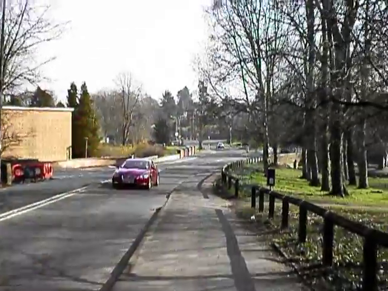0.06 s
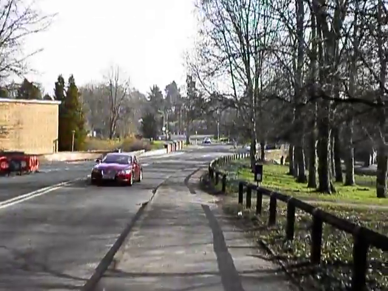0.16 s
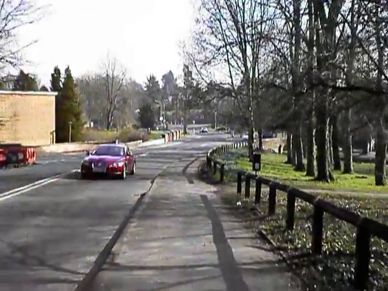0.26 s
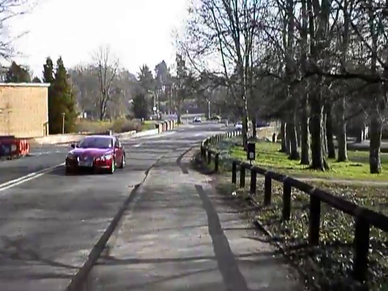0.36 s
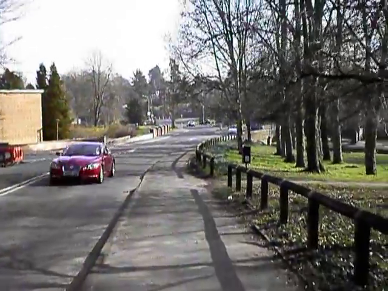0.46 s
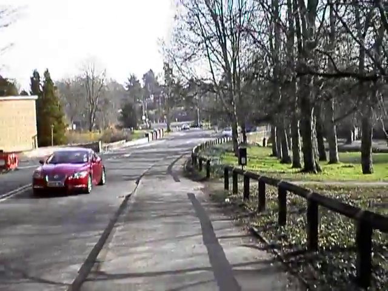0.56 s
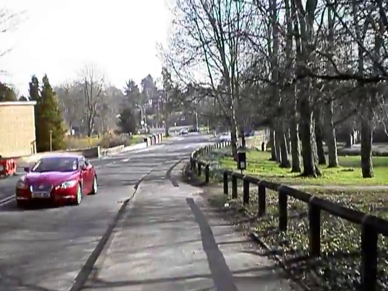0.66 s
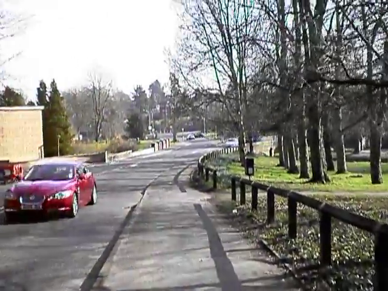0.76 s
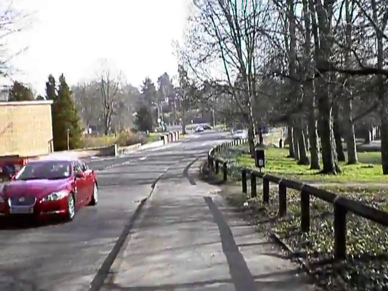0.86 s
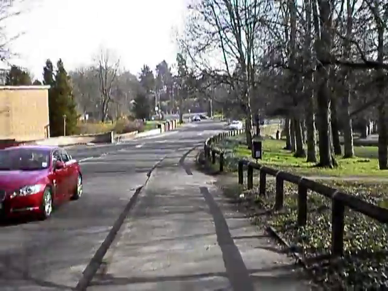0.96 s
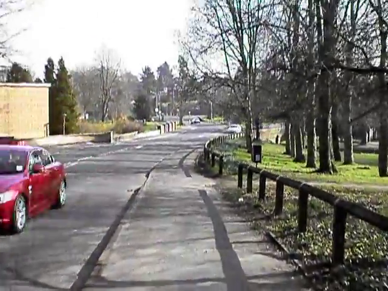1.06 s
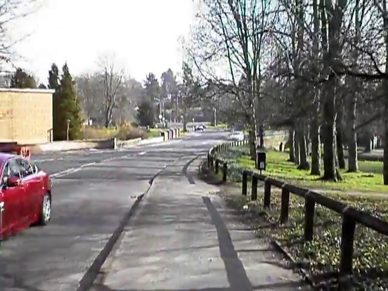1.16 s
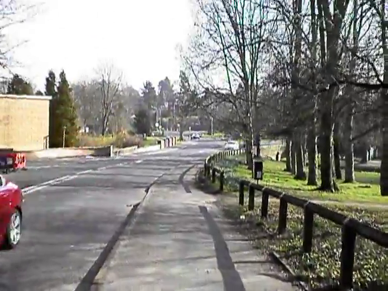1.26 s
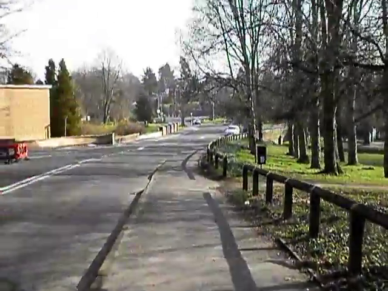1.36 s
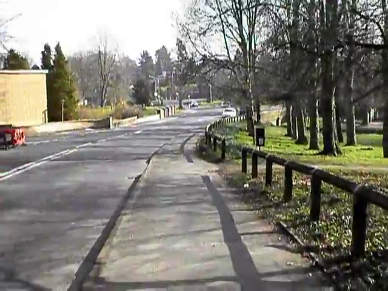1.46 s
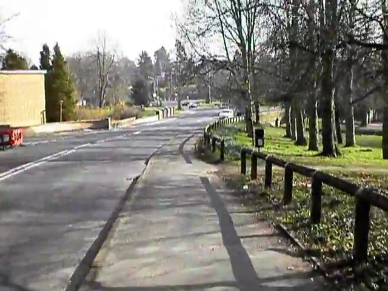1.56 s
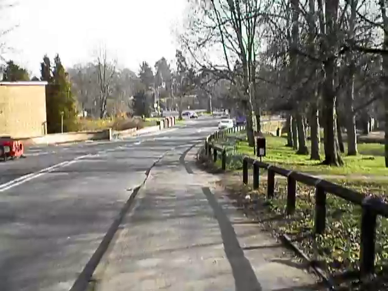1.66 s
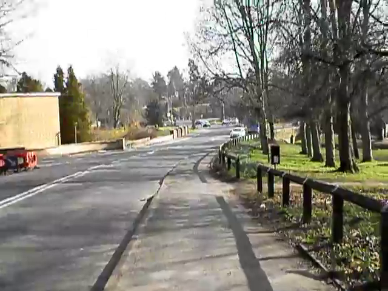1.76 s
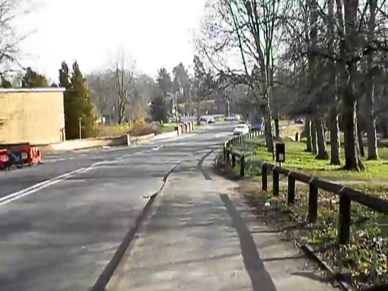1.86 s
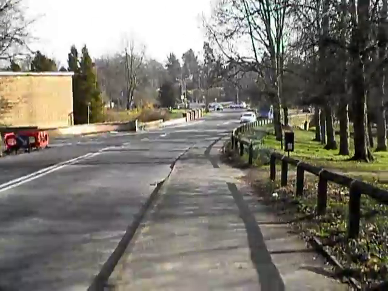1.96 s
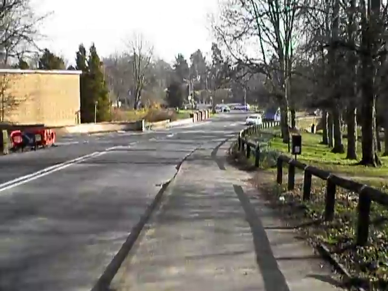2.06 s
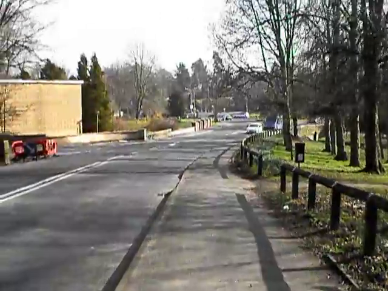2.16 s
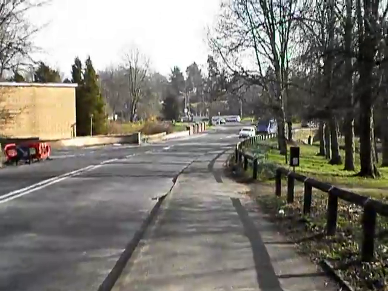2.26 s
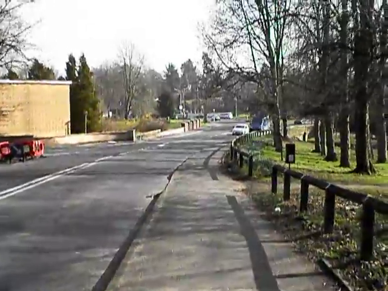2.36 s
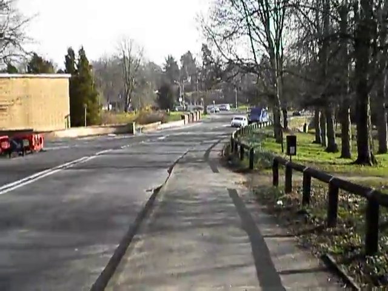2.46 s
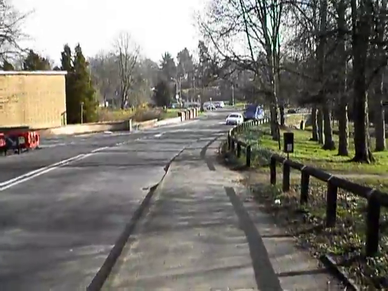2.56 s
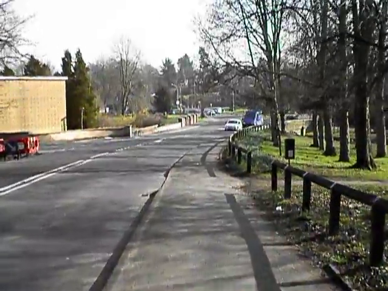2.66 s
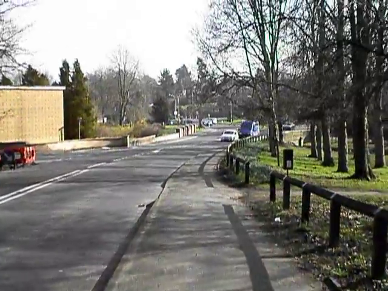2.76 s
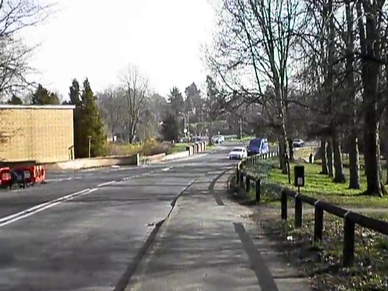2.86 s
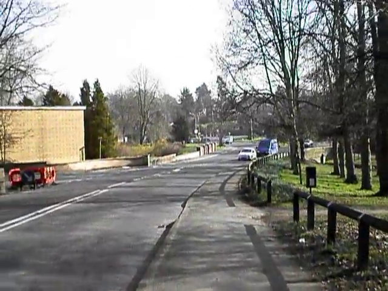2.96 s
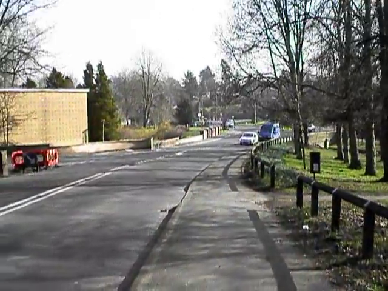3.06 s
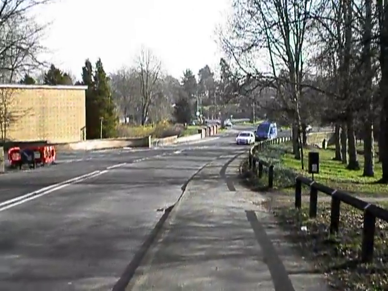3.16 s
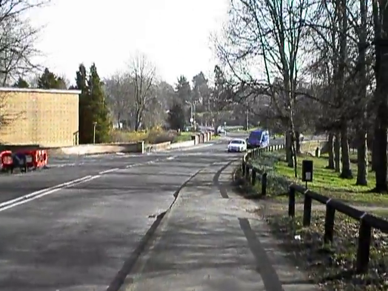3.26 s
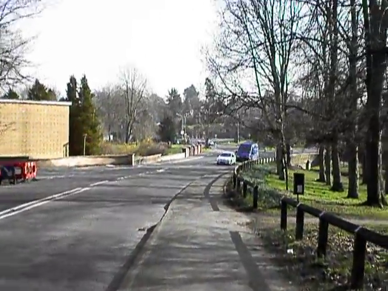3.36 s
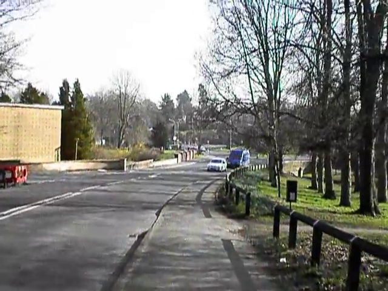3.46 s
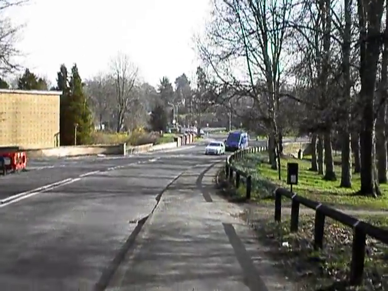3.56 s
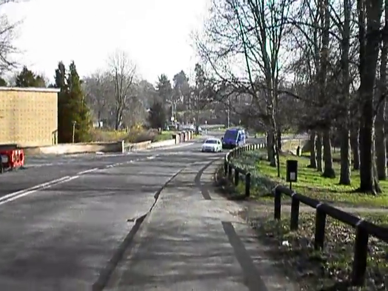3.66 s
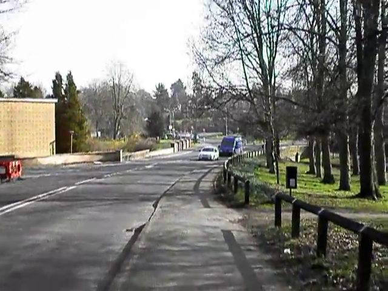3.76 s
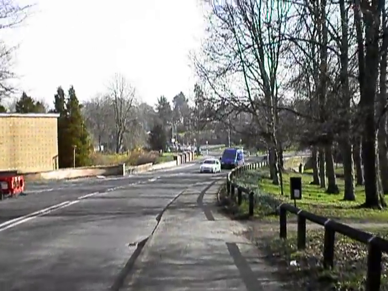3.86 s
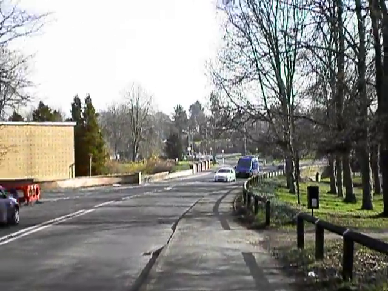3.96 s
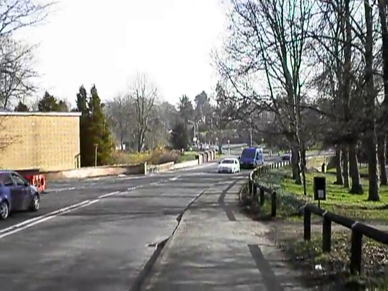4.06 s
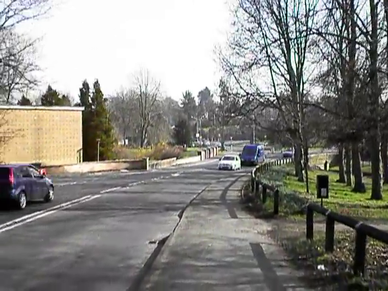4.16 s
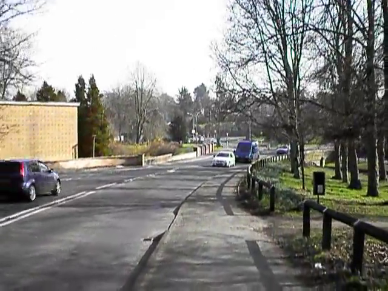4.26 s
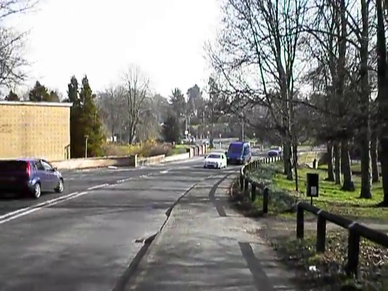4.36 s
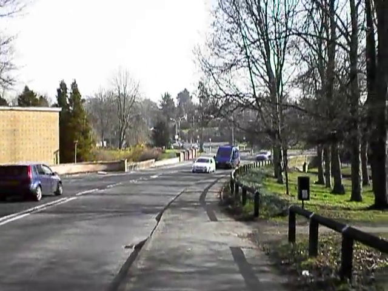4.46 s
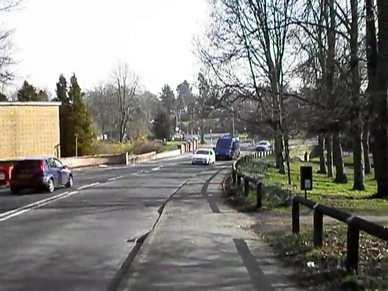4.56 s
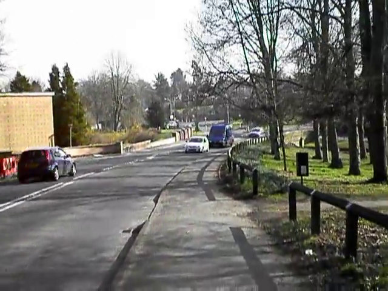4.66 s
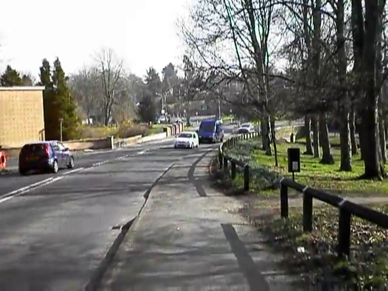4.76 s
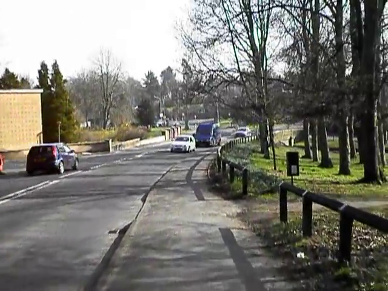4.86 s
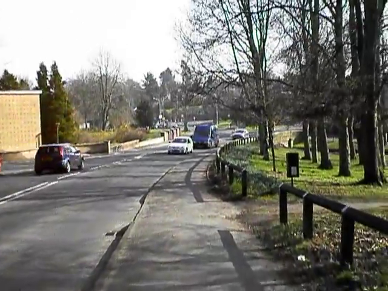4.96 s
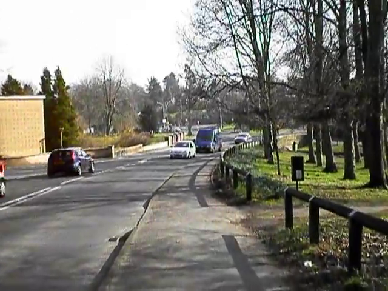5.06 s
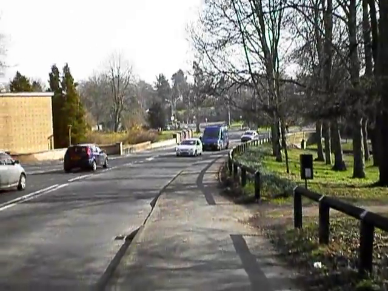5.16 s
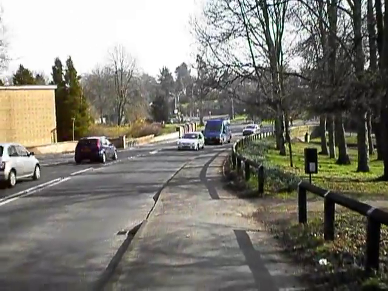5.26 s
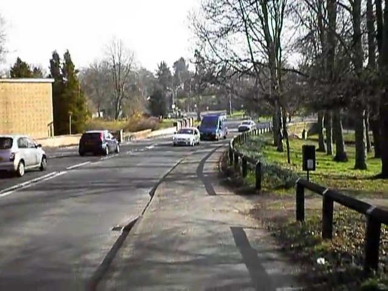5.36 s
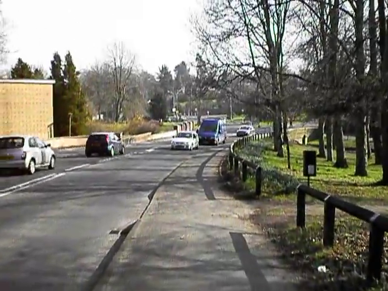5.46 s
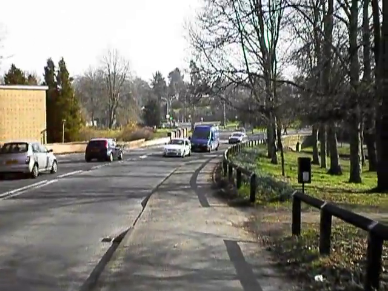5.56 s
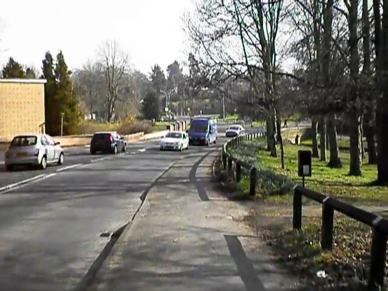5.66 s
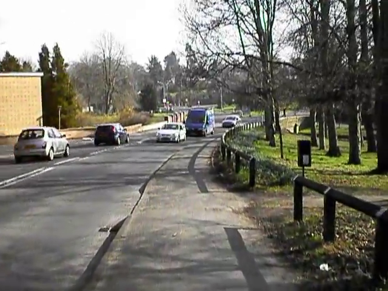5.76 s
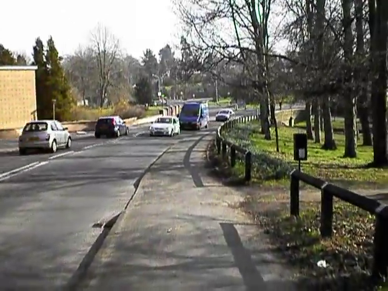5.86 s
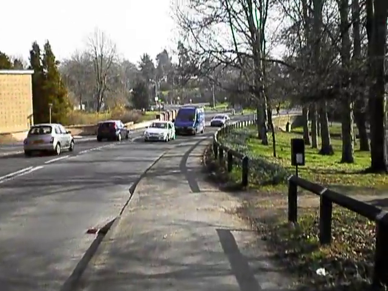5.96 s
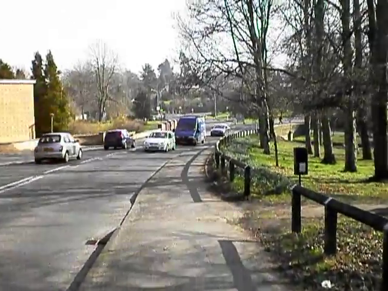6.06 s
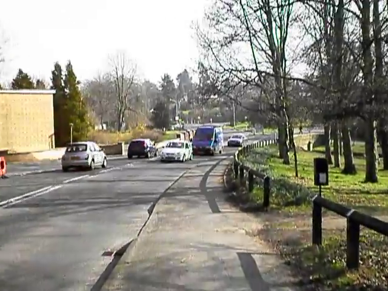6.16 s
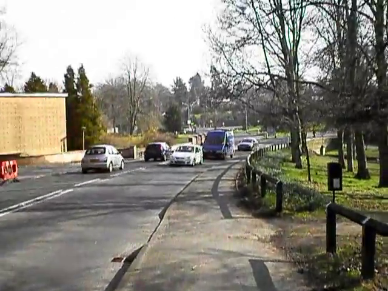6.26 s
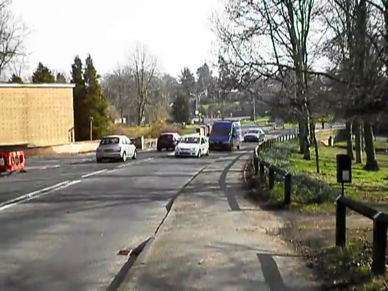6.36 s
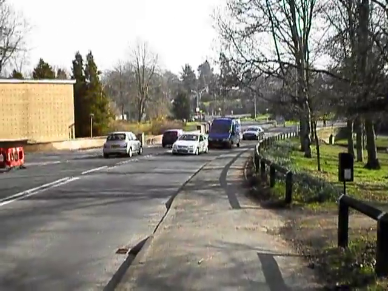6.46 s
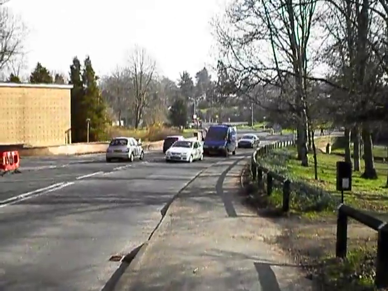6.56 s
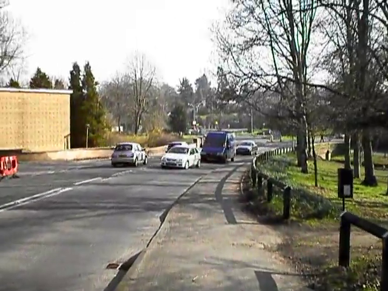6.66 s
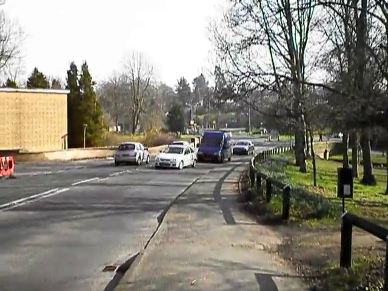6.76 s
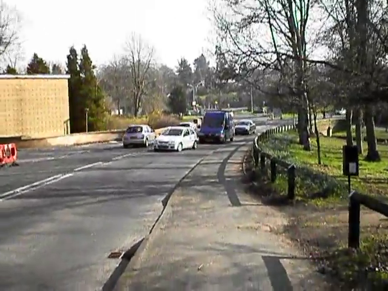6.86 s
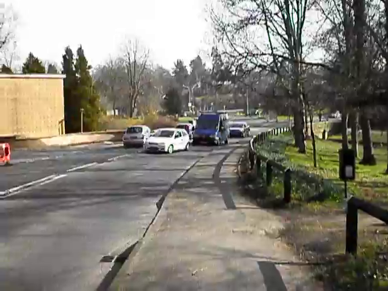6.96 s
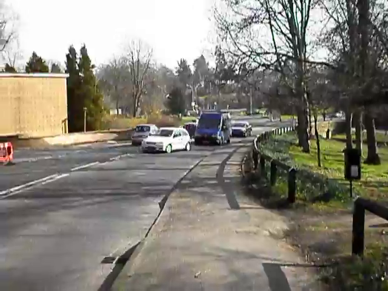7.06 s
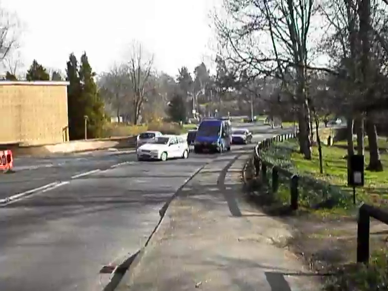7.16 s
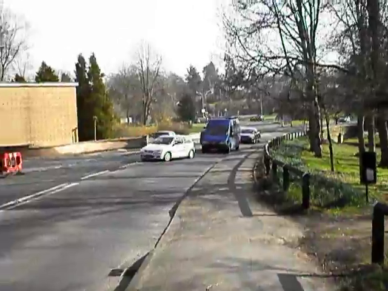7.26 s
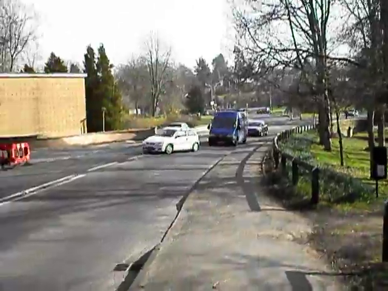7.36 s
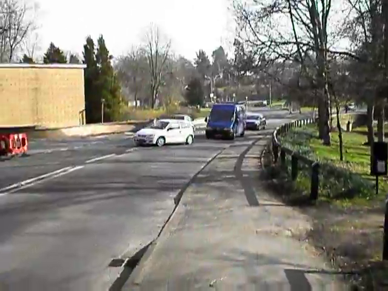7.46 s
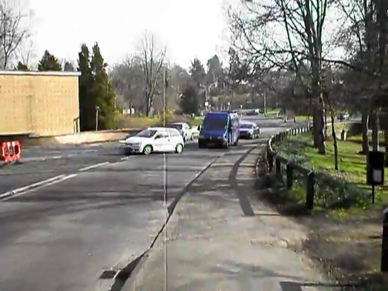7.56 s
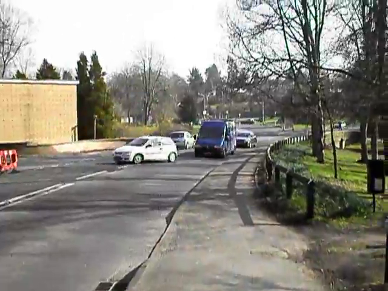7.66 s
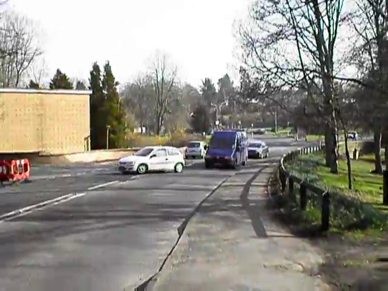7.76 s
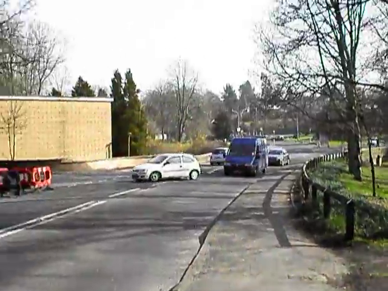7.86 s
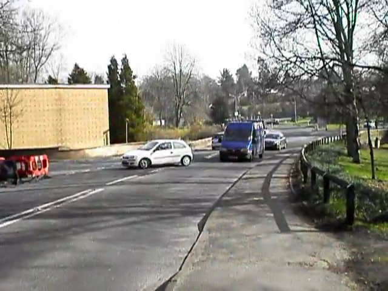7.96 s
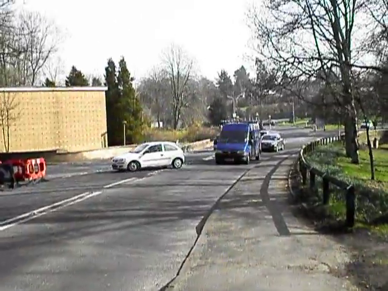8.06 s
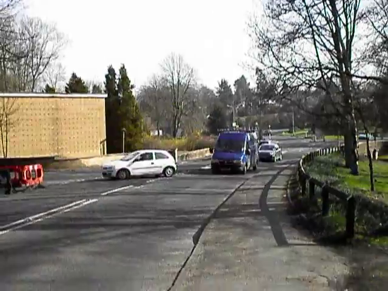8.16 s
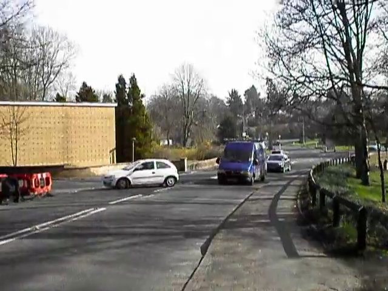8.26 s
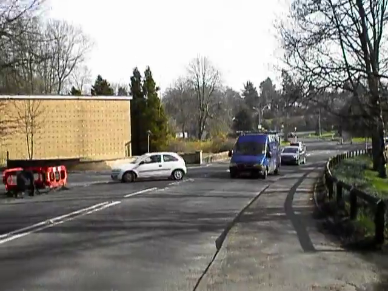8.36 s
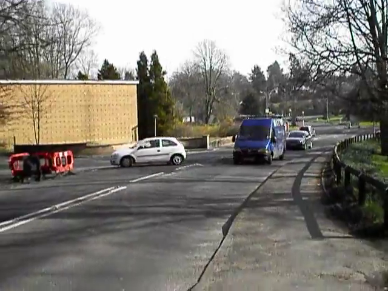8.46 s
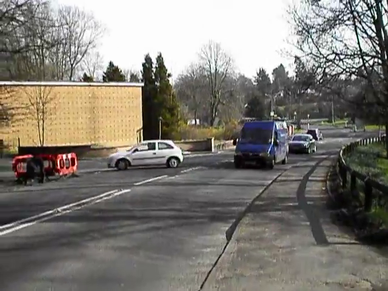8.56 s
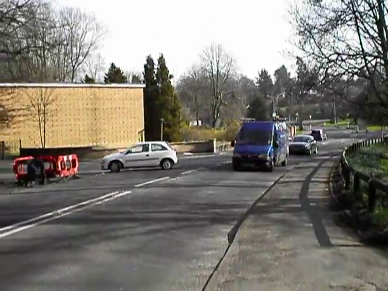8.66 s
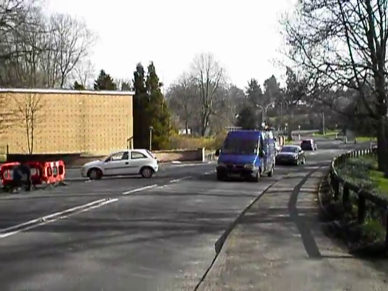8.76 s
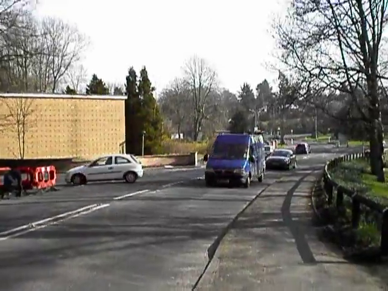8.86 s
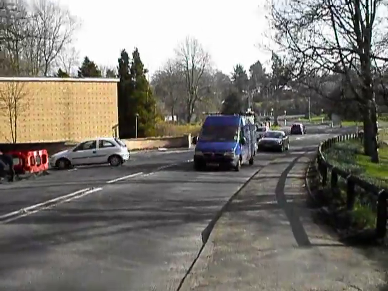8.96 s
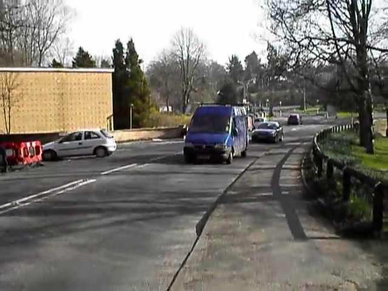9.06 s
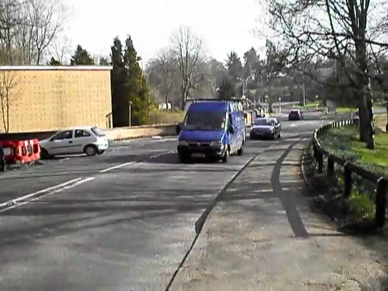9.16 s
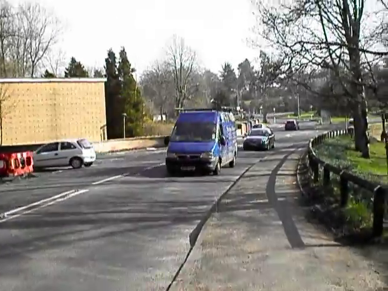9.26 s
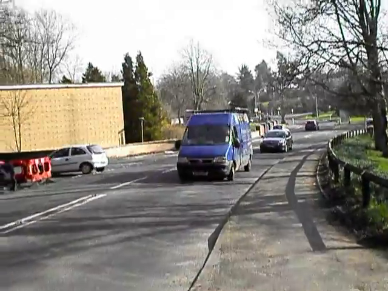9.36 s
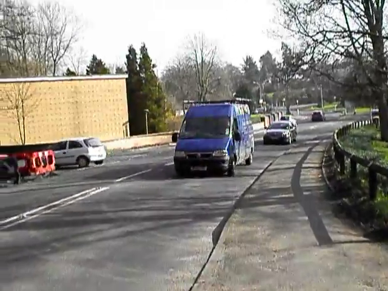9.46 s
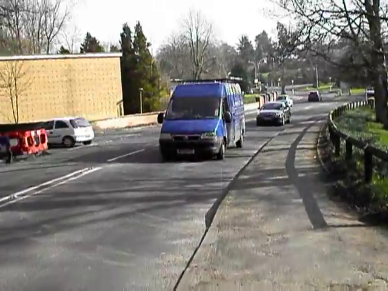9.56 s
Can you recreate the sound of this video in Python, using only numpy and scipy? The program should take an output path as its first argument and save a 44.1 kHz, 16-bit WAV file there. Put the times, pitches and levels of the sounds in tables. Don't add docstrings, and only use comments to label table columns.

```python
import sys
import numpy as np
from scipy import signal
from scipy.fft import rfft, irfft, next_fast_len
from scipy.io import wavfile
from scipy.ndimage import uniform_filter1d

SR = 44100
rng = np.random.default_rng(int(sys.argv[2]) if len(sys.argv) > 2 else 0)


def elevation(decibels):
    levels = np.asarray(decibels, float)
    return 10 ** (levels / 20)


def master(y):
    cut = np.clip(np.atleast_2d(y).T, -1, 1)
    pcm = np.round(cut * 32767)
    wavfile.write(sys.argv[1], SR, pcm.astype(np.int16))


N = 423801
T = np.arange(N) / SR

# t/s, level/dB
ROAD = [(0.0, -36.5), (0.06, -32.5), (0.45, -28.5), (0.7, -26.5), (1.1, -22.5), (1.55, -20), (2.1, -18.5),
        (2.4, -20), (2.9, -22.5), (3.7, -22.5), (4.4, -22.5), (5.5, -24), (6.1, -27.5), (7.1, -26.5),
        (8.08, -22.5), (8.7, -22.5), (9.15, -21), (9.61, -21.5)]
# lower f/Hz, upper f/Hz
ZONES_HZ = [(150, 400), (500, 1600), (2200, 5000), (5600, 7400)]
BANDS_HZ = 110 * 2 ** np.arange(0, 6.4, 1 / 4)
# f/Hz, level/dB per Hz
FAR_TRAFFIC = [(82, -24), (221, -7.5), (339, -8), (399, -21), (455, -15), (1500, -25.5), (6240, -40),
               (7000, -42)]
SALOON_ABREAST = [(82, -34.5), (225, -4), (399, -11), (631, -3), (1010, -8.5), (1380, -8), (2750, -20),
                  (7000, -27)]
SALOON_PAST = [(82, -33), (225, -1), (399, -10), (560, -3.5), (900, -6.5), (1500, -11.5), (2750, -25),
               (7000, -33)]
SALOON_BEHIND = [(82, -26), (200, 3.5), (300, 1.5), (480, -9), (820, -4), (1300, -13.5), (2500, -28),
                 (7000, -46)]
SALOON_LEAVING = [(82, -31), (140, -12.5), (236, -1), (356, -5.5), (998, -7), (1500, -14.5), (3460, -26.5),
                  (7000, -50)]
HATCHBACK = [(82, -32.5), (236, -10.5), (663, -9.5), (1070, -0.5), (1950, -14), (2380, -21.5), (4650, -32),
             (7000, -39)]
SMALL_CAR = [(82, -40), (140, -10), (244, -2), (426, -12), (663, -9), (1140, -9.5), (3350, -27.5),
             (7000, -40)]
QUEUE = [(82, -37), (140, 3.5), (302, 5), (362, -3), (1100, -6.5), (1770, -13.5), (2300, -20.5),
         (7000, -42)]
TURNING_CAR = [(82, -35), (140, -7.5), (252, 2), (440, -3.5), (998, -3), (1860, -6), (5390, -29),
               (7000, -36.5)]
VAN = [(82, -28), (182, 1), (278, 6.5), (312, 1.5), (1260, -4.5), (1690, -8), (3140, -15.5), (7000, -37)]
# t/s at which the colour is pure, tyre colour
LEADS = [(.3, FAR_TRAFFIC), (1.2, SALOON_ABREAST), (1.72, SALOON_PAST), (2.2, SALOON_BEHIND),
         (2.75, SALOON_LEAVING), (3.6, HATCHBACK), (4.9, SMALL_CAR), (6.3, QUEUE), (7.6, TURNING_CAR),
         (9.2, VAN)]
# rumble, hiss, top air level/dB against the roar
BALANCE = [(-6, -15, -21), (-7.5, -14.5, -22.5), (-6, -15, -27.5), (-4.5, -15, -30), (-4.5, -16.5, -32),
           (-1.5, -10, -24.5), (-2, -11.5, -24), (-2.5, -15, -26.5), (-5.5, -16, -26), (-5, -13.5, -22)]
# t/s, hiss gain level/dB, half length t/s
SWISHES = [(0.155, 3.5, 0.16), (0.724, 3, 0.11), (0.975, -1, .12), (1.218, 3.5, 0.08), (1.8, 1, 0.25),
           (2.24, 2, 0.067), (2.63, -1.5, 0.18), (2.97, 2, .15), (3.473, -1, 0.063), (3.6, -2.5, .1),
           (4.5, 1, 0.15), (7.4, 1, .15), (7.725, 1.5, 0.07), (8.157, 1, .1), (8.378, 1.5, 0.056),
           (9.61, 1.5, 0.076)]
# t/s, rumble gain level/dB, half length t/s
BOOMS = [(1.084, 3.5, 0.19), (1.363, -2.5, 0.075), (2.33, 2.5, 0.13), (2.96, 3, 0.091), (3.493, 5, 0.058),
         (3.955, -1, .15), (5.147, -1, .2), (8.43, 4, 0.052)]
# f/Hz, level/dB
PORT = [(1500, -0.7), (2000, 0.8), (2600, -0.8), (4800, 0.6), (5390, -2), (6000, 2), (7000, 0.8),
        (9100, -29.5)]
# t/s, f/Hz, level/dB
TREADS = [
    [(.9, 634, -36), (1.4, 691, -46), (1.8, 759, -31.5), (2.1, 817, -25), (2.4, 798, -28), (2.7, 780, -39)],
    [(3.1, 944, -33.5), (3.6, 983, -33.5), (4.0, 1039, -38), (4.6, 1086, -35), (5.1, 1164, -37),
     (5.55, 1183, -36)],
    [(7.0, 1050, -35.5), (7.4, 1052, -35), (7.8, 983, -36), (8.1, 950, -32.5), (8.2, 960, -48)],
    [(8.6, 1050, -36), (8.8, 1074, -34), (9.1, 1058, -36), (9.61, 1018, -36)],
]
# t/s, f/Hz, level/dB
ENGINES = [
    [(1.6, 177, -46), (2.0, 174, -39.5), (2.3, 168.9, -31.5), (2.55, 164.5, -31.5), (2.85, 160, -44)],
    [(3.4, 255.5, -50), (3.7, 244, -31), (4.0, 236.6, -32), (4.5, 241.4, -28.5), (4.9, 243.7, -34.5),
     (5.2, 242.3, -42), (5.45, 240.4, -32), (5.6, 241.7, -29)],
    [(8.6, 132.5, -56), (8.9, 138, -43), (9.2, 149.8, -38), (9.61, 157.5, -37)],
]
# t/s, peak level/dB as heard, f/Hz
THUMPS = [(0.117, -15, 115), (0.131, -20, 161), (0.148, -6, 154), (0.254, -13, 127), (0.281, -21, 231),
          (0.319, -9, 132), (0.335, -13, 226), (0.389, -23, 200), (0.42, -18, 167), (0.434, -16, 242),
          (0.693, -12.5, 253), (5.538, -13, 214), (5.579, -19, 186.3), (6.02, -17, 124),
          (6.138, -13.5, 153), (7.112, -17.5, 134), (7.494, -12, 188), (7.569, -13.5, 110),
          (7.779, -11, 99), (7.871, -13, 177), (8.16, -10, 151.4), (8.177, -15, 110), (8.222, -10, 150),
          (8.23, -9, 165), (8.358, -13, 135), (8.396, -13, 200), (8.439, -15, 188), (8.509, -14.5, 149),
          (8.529, -15, 131), (9.18, -9.5, 221)]
# peak t/s, build-up t/s, level/dB as heard
GUSTS = [(.154, 0.1, -28.5), (.29, 0.055, -28), (.36, 0.04, -22), (.39, .02, -25.5), (.41, 0.018, -29),
         (.434, 0.034, -25), (7.5, .06, -34), (7.654, .12, -33), (7.794, 0.12, -23.5), (7.868, .03, -29),
         (8.234, 0.098, -25.5), (8.4, .05, -30), (8.444, 0.037, -30), (8.545, 0.02, -32), (8.512, .03, -40)]
# t/s, quick dip level/dB, lingering dip level/dB
DUCKS = [(.152, 8, -0.3), (0.324, 5.5, 2), (.43, 2.5, -0.9), (5.578, 0.5, 2.5), (5.71, 1.5, 0),
         (7.494, 1, 2.1), (7.785, 3.5, .3), (8.11, 1.5, 3), (8.185, 3.5, 3), (8.232, 4, 6), (8.365, 3.5, 1),
         (8.445, 8.5, 2), (8.535, 5, 0.5), (9.19, 3.5, 1.1)]
# t/s, level/dB
WIND = [(0.0, -39.5), (0.24, -38), (0.77, -46), (1.15, -39.5), (1.55, -42.5), (2.19, -39.5), (2.68, -44.5),
        (3.05, -40.5), (4.15, -44), (5.54, -38.5), (6.0, -40.5), (6.29, -46), (6.72, -41.5), (7.5, -40),
        (8.08, -41), (8.4, -23.5), (8.9, -41), (9.31, -37)]
# f/Hz, level/dB per Hz
WIND_COLOUR = [(12, -46.5), (20, -14.5), (70, 1), (160, 0.5), (210, -31.5), (350, -120)]
# t/s, peak level/dB, f/Hz
TICKS = [(0.397, -30, 6100), (0.4604, -30, 5200), (0.5317, -41, 6240), (1.7584, -32, 6180),
         (5.4434, -39, 7126), (5.475, -44.5, 6480), (5.4999, -29, 6280), (6.3989, -40.5, 6650),
         (6.6994, -47, 6000), (7.2195, -39, 6030), (8.4402, -27, 6250), (5.5154, -32, 4300),
         (5.5264, -41, 4520)]
# f/Hz, width f/Hz
NOTCHES = [(3938, 83), (5370, 570), (5906, 13), (7900, 1500)]


def colour(table, hz):
    f, db = np.transpose(table)
    return np.interp(np.log(hz), np.log(f), db)


def curves(table):
    s, *columns = np.transpose(table)
    return [np.interp(T, s, column) for column in columns]


def humps(t, table):
    return sum(gain * np.clip(1 - abs(t - s) / half, 0, 1) for s, gain, half in table)


def walk(rate_hz):
    hold = int(SR / rate_hz)
    steps = np.repeat(rng.standard_normal(N // hold + 1), hold)
    smooth = uniform_filter1d(uniform_filter1d(steps, hold), hold)[:N]
    return smooth / smooth.std()


def glide(table):
    hz, db = curves(table)
    since_start, until_end = T - table[0][0], table[-1][0] + 0.05 - T
    fade = np.clip(np.minimum(since_start, until_end) / 0.12, 0, 1)
    return 2 * np.pi * np.cumsum(hz) / SR, fade * elevation(db)


def burst(out, s, peak_db, hz, turns, phase):
    cycles = np.arange(int(SR * turns / hz)) / SR * hz
    start = int(s * SR)
    wave = np.hanning(len(cycles)) * np.cos(2 * np.pi * (cycles - turns / 2) + phase)
    return out + np.pad(elevation(peak_db) * wave, (start, N))[:N]


def zone_levels(t):
    lead_s = [s for s, _ in LEADS]
    rumble, hiss, air = (np.interp(t, lead_s, column) for column in np.transpose(BALANCE))
    swish = humps(t, SWISHES)
    against_roar = np.array([rumble + humps(t, BOOMS), -0.2 * swish, hiss + swish, air + 2.24 * swish])
    return np.interp(t, *np.transpose(ROAD)) + against_roar


def tyres():
    t, place = T[::64], np.log(BANDS_HZ)
    lead_s = [s for s, _ in LEADS]
    tones = np.array([colour(table, BANDS_HZ) + colour(PORT, BANDS_HZ) for _, table in LEADS])
    db = np.array([np.interp(t, lead_s, band) for band in tones.T])

    power = elevation(2 * db) * (BANDS_HZ * np.log(2) / 4)[:, None]
    held = []
    for low, high in ZONES_HZ:
        inside = (BANDS_HZ >= low) & (BANDS_HZ < high)
        held.append(10 * np.log10(power[inside].sum(axis=0)))
    centres = np.log(np.mean(ZONES_HZ, axis=1))
    share = np.array([np.interp(place, centres, one) for one in np.eye(len(ZONES_HZ))])
    db = db + share.T @ (zone_levels(t) - held)

    size = next_fast_len(N)
    f = np.log(np.fft.rfftfreq(size, 1 / SR) + 1)
    noise = rfft(rng.standard_normal(size)) * np.sqrt(SR / 2)
    bumps, sizzle, out = walk(8.1), walk(12), 0
    for k in range(len(place)):
        treble = 1 - share[:2, k].sum()
        waver = 0.28 * bumps + 0.55 * treble * sizzle + 0.8 * walk(5)
        weight = np.interp(f, place, np.arange(len(place)) == k, left=0)
        band = irfft(noise * weight, size)[:N]
        out = out + elevation(np.interp(T, t, db[k]) + waver) * band
    return out


def treads():
    out, width_hz = 0, 150
    for phase, size in map(glide, TREADS):
        unsteady = elevation(3.5 * walk(12))
        song = walk(width_hz) * np.sin(phase) + walk(width_hz) * np.cos(phase)
        out = out + size * unsteady * song
    return out


def engines():
    out = 0
    for phase, size in map(glide, ENGINES):
        unsteady = elevation(3.0 * walk(12))
        out = out + np.sqrt(2) * size * unsteady * np.sin(phase + 1.1 * walk(35))
    return out


def thumps():
    out = np.zeros(N)
    for s, db, hz in THUMPS:
        out = burst(out, s - 0.002, db - 2, hz, turns=1.6, phase=0.4 * rng.standard_normal())
    return out


def gusts():
    flap_band = signal.butter(2, [130, 340], "band", fs=SR, output="sos")
    flap = signal.sosfilt(flap_band, rng.standard_normal(N)) * elevation(2.0 * walk(45))
    size, break_off_s = np.zeros(N), 0.035
    for s, rise, db in GUSTS:
        size += elevation(db - 4.5) * np.interp(T, [s - rise, s, s + break_off_s], [0, 1, 0])
    return flap / flap.std() * uniform_filter1d(size, size=256)


def flinch():
    grab_s, release_s, linger_s = 0.012, 0.045, 0.27
    dip_db = np.zeros(N)
    for s, quick, slow in DUCKS:
        since = np.maximum(T - s, 0)
        grab = 1 - np.exp(-since / grab_s)
        dip_db += grab * (1.86 * quick * np.exp(-since / release_s) + slow * np.exp(-since / linger_s))
    return elevation(-dip_db)


def wind():
    size = next_fast_len(N)
    spectrum = elevation(colour(WIND_COLOUR, np.fft.rfftfreq(size, 1 / SR) + 1))
    air = irfft(rfft(rng.standard_normal(size)) * spectrum, size)[:N]
    air = air * elevation(2.8 * walk(30))
    return air / air.std() * elevation(curves(WIND)[0] + 5.5)


def ticks():
    out = np.zeros(N)
    for s, db, hz in TICKS:
        out = burst(out, s, db + 1, hz, turns=11, phase=0)
    return out


def scene():
    road = tyres() + treads() + engines()
    buffeting = (thumps() + gusts()) / flinch()
    return (road + buffeting + wind() + ticks())[None]


def roll_off(x):
    return signal.sosfilt(signal.butter(12, 9200, fs=SR, output="sos"), x)


def record(dry):
    x = dry * flinch()
    x = signal.sosfilt(signal.butter(1, 45, "high", fs=SR, output="sos"), x)
    for hz, width in NOTCHES:
        x = signal.lfilter(*signal.iirnotch(hz, hz / width, fs=SR), x)
    x = signal.sosfilt(signal.butter(10, 7350, fs=SR, output="sos"), x)
    x = signal.sosfilt(signal.ellip(14, 0.1, 100, 7900, fs=SR, output="sos"), x)
    x = x * (1 + 2 * np.cos(2 * np.pi * 16000 * T))
    x = signal.sosfilt(signal.ellip(6, 0.5, 50, 8700, fs=SR, output="sos"), x)
    x = signal.sosfilt(signal.butter(16, 7760, fs=SR, output="sos"), x)
    return roll_off(x)


dry = scene()
out = record(dry)
master(out)
```